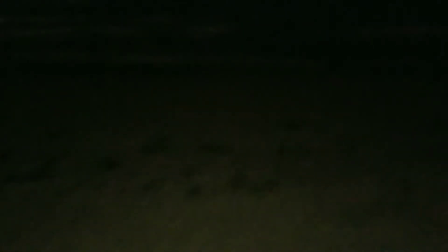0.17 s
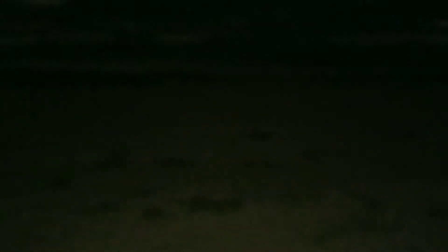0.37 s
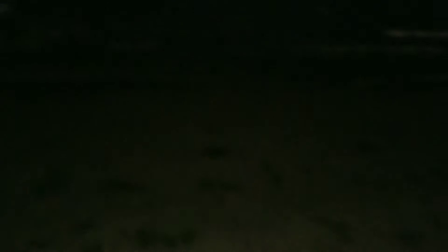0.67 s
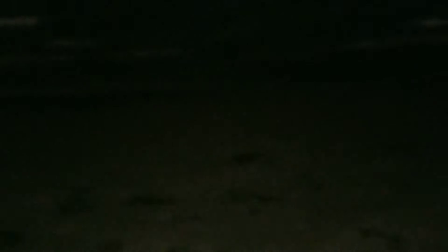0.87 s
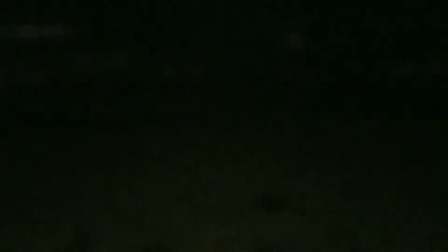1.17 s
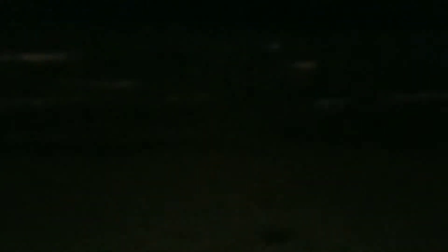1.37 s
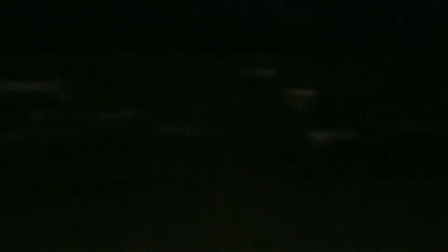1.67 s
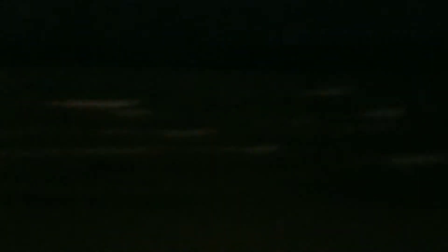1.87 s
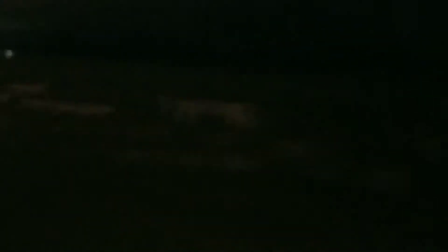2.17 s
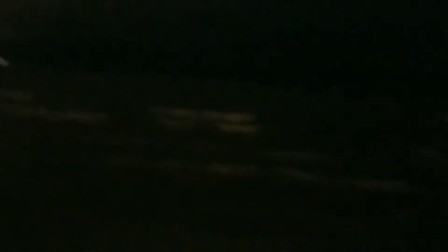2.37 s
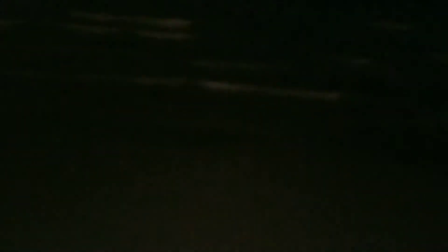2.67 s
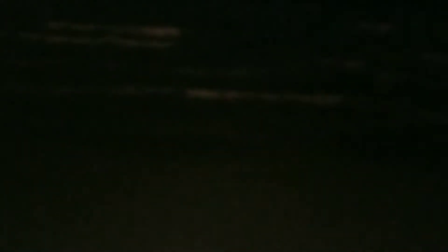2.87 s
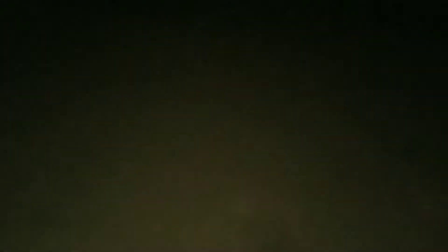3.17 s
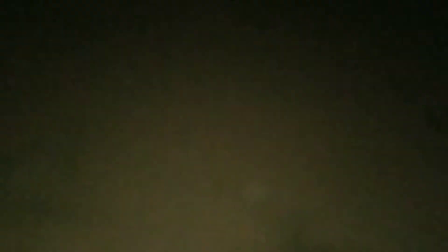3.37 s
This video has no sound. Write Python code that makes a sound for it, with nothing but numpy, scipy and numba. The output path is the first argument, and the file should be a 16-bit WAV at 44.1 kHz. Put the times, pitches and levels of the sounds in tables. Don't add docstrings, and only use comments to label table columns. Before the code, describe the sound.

Wind thumping and rumbling on a microphone at a night beach, far surf roaring behind

```python
import sys
import numpy as np
from scipy import signal
from scipy.fft import rfft, irfft
from scipy.io import wavfile
from scipy.ndimage import uniform_filter1d
from numba import njit

SR = 44100
rng = np.random.default_rng(int(sys.argv[2]) if len(sys.argv) > 2 else 0)


def to_wav(s):
    ch = np.atleast_2d(s).T
    pcm = np.round(np.clip(ch, -1, 1) * 32767)
    wavfile.write(sys.argv[1], SR, pcm.astype(np.int16))


def gain_from_db(level_db):
    decades = np.asarray(level_db, float) / 20
    return 10 ** decades


N = 155232
T = np.arange(N) / SR


def unit(x):
    return x / np.sqrt(np.mean(x ** 2))


def curve(table, axis=1):
    rows = np.array(table)
    return np.interp(T, rows[:, 0], rows[:, axis])


def smooth_twice(x, size):
    return uniform_filter1d(uniform_filter1d(x, size), size)


def walk(rate):
    hold = int(SR / rate)
    steps = np.repeat(rng.standard_normal(N // 200), hold)[:N]
    return 0.96 * smooth_twice(steps, hold)


def colour(x, table):
    hz, db = np.array(table).T
    bins = np.maximum(np.arange(N // 2 + 1) * SR / N, 1)
    gain = gain_from_db(np.interp(np.log(bins), np.log(hz), db))
    return unit(irfft(rfft(x) * gain, N))


def peak(x, hz, width_hz):
    return signal.lfilter(*signal.iirpeak(hz, hz / width_hz, fs=SR), x)


# (time [s], level [dB])
SURF_SWELL = [
    (0, 0),
    (1.5, 0.5),
    (2.6, 2.5),
    (3.52, 1.5),
]
# (frequency [Hz], level per Hz [dB])
SURF_OPEN = [(120, 4.5), (500, -3.5), (1100, -4.5), (1900, -7.5), (2600, -12), (3800, -17), (5900, -27.5),
             (15000, -35)]
# (frequency [Hz], level per Hz [dB])
SURF_COVERED = [(120, 13), (300, 5.5), (600, 4.5), (1200, -4), (2000, -13.5), (3000, -22), (4000, -54),
                (5000, -74)]


def surf():
    alike, lead_s = 0.39, .0002
    common, own, port_noise = rng.standard_normal((3, N))
    early = np.roll(common, -int(lead_s * SR))
    left = colour(alike * early + np.sqrt(1 - alike ** 2) * own, SURF_COVERED)
    cavity = gain_from_db(19.5) * peak(left, hz=885, width_hz=218)
    upper = gain_from_db(11) * peak(left, hz=960, width_hz=80)
    left = unit(left + cavity + upper)

    port_hz, port_width_hz, port_edge_hz = 4990, 2080, 5390
    ring = peak(peak(port_noise, port_hz, port_width_hz), port_hz, port_width_hz)
    edge = signal.cheby1(6, 2, port_edge_hz, fs=SR, output="sos")
    ring = unit(signal.sosfilt(edge, ring))
    rub_db = curve(RUB)
    sway_db = 1.6 * walk(11) + .07 * (rub_db - np.mean(rub_db))
    right = gain_from_db(-28) * colour(common, SURF_OPEN) + gain_from_db(-41 + sway_db) * ring

    drift_db = .5 * walk(9)
    return gain_from_db(curve(SURF_SWELL) + drift_db) * np.array([gain_from_db(-26.5) * left, right])


@njit
def puffs(at, hz, size, turn, cycles, n, sr):
    out = np.zeros(n)
    for k in range(len(at)):
        period = sr / hz[k]
        reach = 3 * cycles * period
        for i in range(max(int(at[k] - reach), 0), min(int(at[k] + reach), n)):
            u = (i - at[k]) / period
            out[i] += size[k] * np.exp(-.5 * (u / cycles) ** 2) * np.cos(2 * np.pi * u + turn[k])
    return out


def eddies(centre_hz, scatter_db, spread):
    eddies_per_s, even_s, even_share = 600, .07, .8
    count = int(eddies_per_s * N / SR)
    at = rng.uniform(0, N - 1, count)
    centre = centre_hz[at.astype(int)]
    hz = centre * np.exp(spread * np.clip(rng.standard_normal(count), -2.5, 1.5))
    size = gain_from_db(scatter_db * rng.exponential(size=count))
    size = size * np.minimum(centre / hz, 1) ** .45
    turn = rng.uniform(0, 2 * np.pi, count)
    x = puffs(at, np.clip(hz, 20., 2000.), size, turn, .36, N, SR)
    power = smooth_twice(x ** 2, int(even_s * SR))
    return unit(x / power ** (even_share / 2))


def single_eddies(table, db, cycles):
    at, peak_db, hz = np.array(table, float).T.copy()
    turn = rng.uniform(0, 2 * np.pi, len(at))
    return puffs(at * SR, hz, gain_from_db(peak_db + db), turn, 1. * cycles, N, SR)


# (time [s], level [dB], eddy pitch [Hz])
GUST = [(0, -19.5, 190), (.13, -27, 122), (.5, -26.5, 117), (.62, -23, 193), (.76, -17, 225),
        (.9, -23, 200), (1.2, -23.5, 186), (1.5, -22, 202), (1.75, -22.5, 178), (2.08, -26, 130),
        (2.38, -22, 122), (2.47, -20.5, 156), (2.62, -27, 131), (2.86, -21.5, 164), (2.96, -24, 155),
        (3.07, -21, 243), (3.36, -16, 255), (3.52, -18, 296)]
# (time [s], peak level [dB], pitch [Hz])
SHARP_EDDIES = [(0.01, -19.8, 393), (0.071, -19.0, 420), (0.097, -14.8, 435), (0.617, -12.9, 393),
                (0.736, -11.9, 413), (0.776, -10.6, 397), (0.824, -14.0, 393), (0.848, -12.9, 389),
                (0.958, -10.3, 415), (1.035, -16.6, 388), (1.087, -14.8, 410), (1.152, -15.9, 375),
                (1.193, -17.6, 388), (1.219, -15.9, 414), (1.25, -16.2, 391), (1.435, -16.6, 394),
                (1.465, -12.9, 403), (1.608, -16.0, 380), (1.71, -13.4, 355), (2.471, -20.3, 358),
                (2.672, -14.9, 383), (2.703, -18.9, 418), (2.888, -16.5, 394), (3.049, -12.3, 392),
                (3.076, -15.3, 400), (3.103, -15.3, 368), (3.125, -8.3, 382), (3.234, -8.9, 402),
                (3.274, -10.5, 402), (3.307, -11.1, 424), (3.335, -9.1, 411), (3.361, -12.1, 457),
                (3.387, -9.6, 409), (3.451, -13.4, 383), (3.493, -6.8, 407), (3.518, -5.5, 418)]
# (time [s], peak level [dB], pitch [Hz])
BIG_EDDIES = [(0.096, -3.6, 185), (0.171, -9.0, 150), (0.581, -8.6, 188), (0.659, -5.2, 141),
              (0.707, -8.9, 181), (0.748, -5.7, 142), (0.764, -2.5, 222), (0.779, -4.6, 178),
              (0.847, -5.6, 181), (0.876, -9.2, 167), (1.007, -8.7, 164), (1.035, -9.4, 238),
              (1.053, -9.1, 238), (1.152, -3.2, 212), (1.17, -7.7, 200), (1.201, -9.5, 203),
              (1.273, -9.0, 200), (1.296, -8.2, 151), (1.379, -9.3, 202), (1.422, -8.5, 203),
              (1.436, -7.7, 247), (1.471, -8.5, 180), (1.538, -8.3, 251), (1.561, -9.3, 193),
              (1.733, -8.1, 162), (1.828, -9.5, 202), (2.453, -6.2, 171), (2.473, -5.1, 159),
              (2.673, -6.9, 207), (2.82, -8.0, 152), (2.837, -6.6, 150), (2.878, -5.8, 194),
              (2.895, -5.6, 221), (2.915, -3.1, 141), (3.003, -5.5, 128), (3.019, -7.7, 201),
              (3.047, -4.9, 159), (3.062, -7.4, 146), (3.077, -7.1, 216), (3.097, -7.9, 217),
              (3.127, -1.6, 197), (3.14, -5.8, 229), (3.152, -8.0, 181), (3.172, -9.2, 206),
              (3.191, -6.8, 143), (3.21, -8.6, 199), (3.234, -5.0, 273), (3.264, -8.9, 293),
              (3.276, -5.6, 172), (3.297, -7.2, 255), (3.327, -5.7, 234), (3.352, -0.4, 188),
              (3.37, -5.4, 188), (3.385, -2.3, 194), (3.398, -7.7, 252), (3.425, -5.2, 236),
              (3.46, -6.5, 211), (3.478, -6.9, 193), (3.492, -3.8, 281), (3.518, -6.2, 391)]
# (time [s], peak level [dB], pitch [Hz])
DEEP_EDDIES = [(0.1, -12.0, 75), (0.171, -17.4, 84), (0.388, -16.1, 82), (0.662, -11.4, 88),
               (0.744, -14.4, 68), (0.978, -16.9, 80), (1.121, -17.2, 79), (1.24, -14.9, 76),
               (1.422, -17.2, 78), (1.478, -15.8, 85), (1.734, -15.6, 88), (1.978, -17.3, 87),
               (2.154, -14.0, 71), (2.247, -14.1, 68), (2.359, -16.6, 68), (2.474, -13.2, 80),
               (2.55, -17.0, 92), (2.732, -13.1, 84), (2.832, -10.9, 88), (2.915, -9.4, 77),
               (3.0, -12.1, 91), (3.051, -9.4, 77), (3.128, -12.6, 88), (3.284, -15.0, 86),
               (3.355, -13.1, 89), (3.503, -13.4, 84)]


def open_wind():
    thumps = single_eddies(BIG_EDDIES, db=.5, cycles=.36)
    thumps = thumps + single_eddies(SHARP_EDDIES, db=-.5, cycles=.7)
    lull = 1 / (1 + 7 * uniform_filter1d(np.abs(thumps), size=300))
    stream = eddies(curve(GUST, axis=2), scatter_db=0.5, spread=0.53)
    stream = gain_from_db(curve(GUST) + 4) * stream
    return lull * stream + thumps + single_eddies(DEEP_EDDIES, db=1.5, cycles=.6)


# (time [s], level [dB])
RUMBLE_SWELL = [
    (0, 3),
    (.3, -10),
    (.75, 7),
    (1.5, 6),
    (1.9, -18),
    (2.25, 9),
    (2.65, 4),
    (3.05, 10),
    (3.52, 3),
]


def wind_rumble():
    stream = eddies(np.full(N, 55.), scatter_db=4.3, spread=0.39)
    return gain_from_db(-31 + curve(RUMBLE_SWELL)) * stream


# (time [s], level [dB])
COVERED_GUST = [
    (0, -6),
    (.3, -5),
    (1.0, -4),
    (1.3, 1),
    (1.5, -9),
    (1.72, 0),
    (2.1, -1.5),
    (2.6, 1),
    (3.0, 0),
    (3.52, -5),
]


def covered_wind():
    flicker_db = 1.5 * walk(12)
    stream = eddies(np.full(N, 131.), scatter_db=1.8, spread=0.54)
    return gain_from_db(-32 + curve(COVERED_GUST) + flicker_db) * stream


# (time [s], level [dB])
RUB = [(0, -57), (.12, -53), (.21, -48.5), (.25, -62), (.8, -60), (1.02, -57), (1.08, -51), (1.24, -47.5),
       (1.33, -50.5), (1.48, -51.5), (1.56, -62), (2.1, -57), (2.4, -52), (2.62, -52), (2.72, -47.5),
       (2.86, -54), (3.27, -55), (3.33, -51)]


def cloth_hiss():
    grain_db = 1.6 * rng.exponential(size=N // 20 + 1).repeat(20)[:N]
    fibres = rng.standard_normal(N) * gain_from_db(grain_db)
    rub_hz, rub_width_hz, air_hz, air_width_hz = 13130, 2800, 15000, 1800
    hiss = unit(peak(peak(fibres, rub_hz, rub_width_hz), rub_hz, rub_width_hz * 2.1))
    air = unit(peak(peak(fibres, air_hz, air_width_hz), air_hz, air_width_hz))
    flicker_db = 1.5 * walk(25) + 1.6 * walk(11)
    return gain_from_db(curve(RUB) + 6 + flicker_db) * (hiss + gain_from_db(-13) * air)


# (time [s], length [s], level [dB], centre [Hz])
SWISHES = [
    (.135, .05, -29.5, 1650),
    (.15, .045, -41, 2300),
    (.47, .085, -34.5, 1750),
    (1.42, .05, -35, 1750),
    (1.8, .04, -36, 1800),
    (3.42, .07, -34, 2000),
    (3.42, .08, -36, 3000),
]


def sleeve_swishes():
    out = np.zeros(N)
    for at, length, db, hz in SWISHES:
        swell = np.exp(-.5 * ((T - at) / length) ** 2)
        noise = peak(peak(rng.standard_normal(N), hz, width_hz=900), hz, width_hz=900)
        out = out + gain_from_db(db) * swell * unit(noise)
    return out


# (time [s], pitch [Hz], level [dB])
SQUEAK = [(2.9, 10800, -70), (2.91, 11200, -49), (2.928, 12150, -45), (2.942, 12480, -50),
          (2.968, 11950, -50), (2.995, 12000, -52), (3.02, 12000, -66), (3.045, 12000, -52),
          (3.07, 11700, -62), (3.09, 11200, -51), (3.125, 10900, -51), (3.15, 10600, -72)]


def cloth_squeak():
    glide_hz = curve(SQUEAK, axis=1) * (1 + .006 * walk(150))
    level_db = curve(SQUEAK, axis=2) + 4 * walk(60) + 1.0
    return gain_from_db(level_db) * np.sin(2 * np.pi * np.cumsum(glide_hz) / SR)


def scene():
    roar = surf()
    wind = open_wind()
    right = wind + wind_rumble()
    left = covered_wind() + gain_from_db(-42) * wind
    right = right + cloth_hiss() + sleeve_swishes() + cloth_squeak()
    return np.array([left, right]) + roar


def top_cut(x):
    return signal.sosfilt(signal.butter(12, 15400, fs=SR, output="sos"), x)


def record(dry):
    low_cut_hz, hiss_db = (40, 67.4), np.array([-108, -53])
    x = np.zeros(dry.shape)
    for side, hz in enumerate(low_cut_hz):
        x[side] = signal.sosfilt(signal.butter(2, hz, "high", fs=SR, output="sos"), dry[side])
    x = x + gain_from_db(hiss_db)[:, None] * rng.standard_normal(dry.shape)
    top_hz = 15200
    x = signal.sosfilt(signal.butter(4, top_hz, fs=SR, output="sos"), x)
    mix = np.tanh(.75 * x) / .75
    return top_cut(mix)


dry = scene()
out = record(dry)
to_wav(out)
```